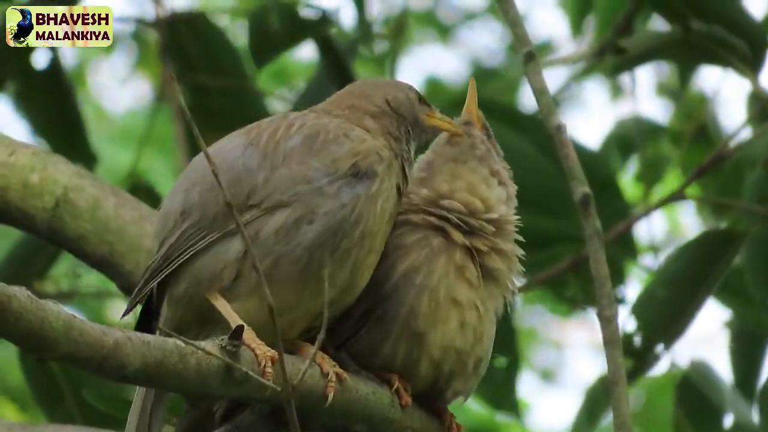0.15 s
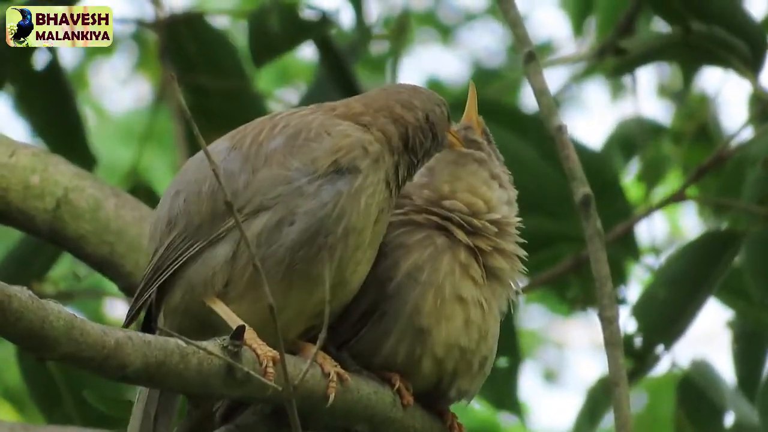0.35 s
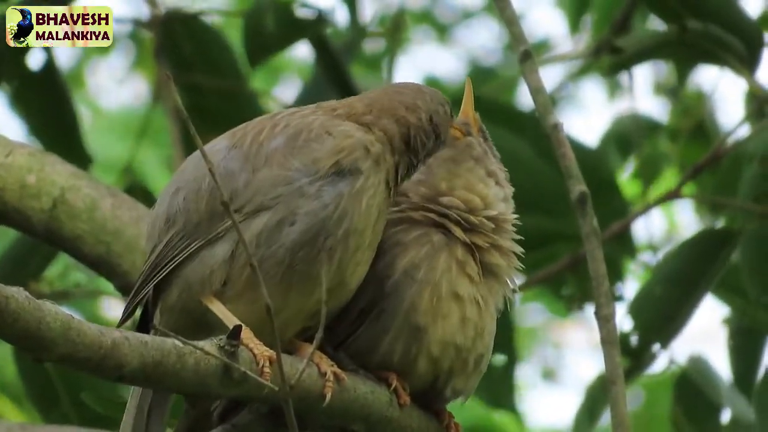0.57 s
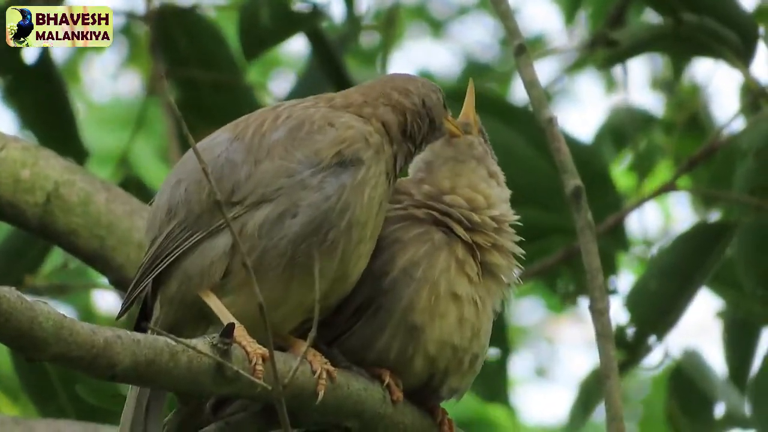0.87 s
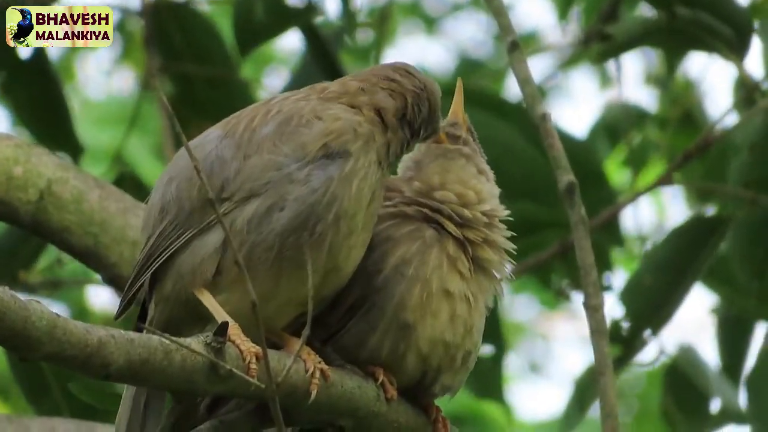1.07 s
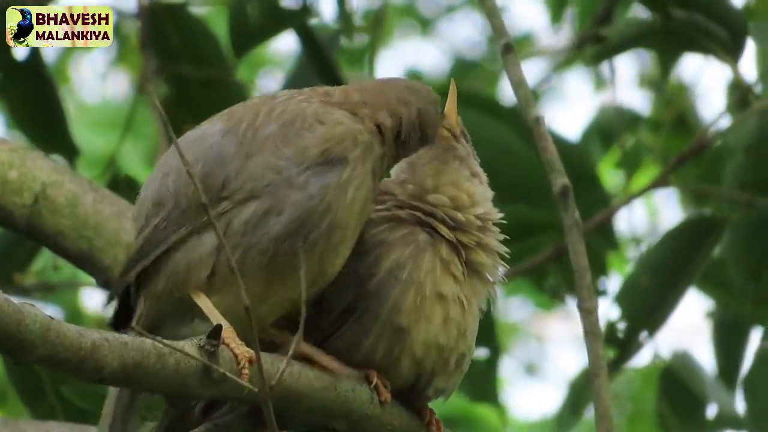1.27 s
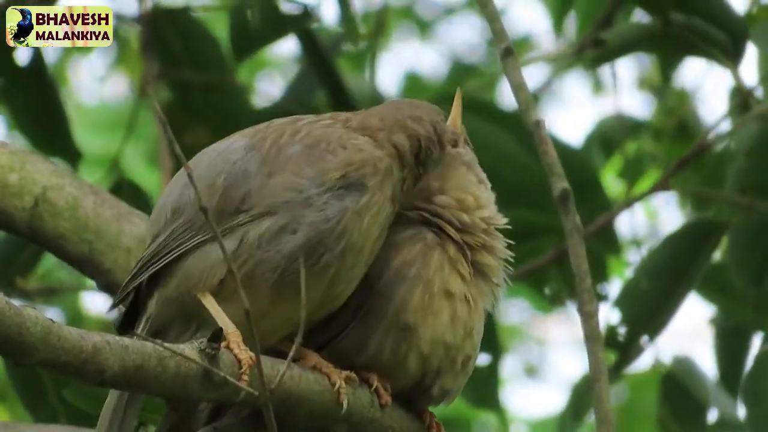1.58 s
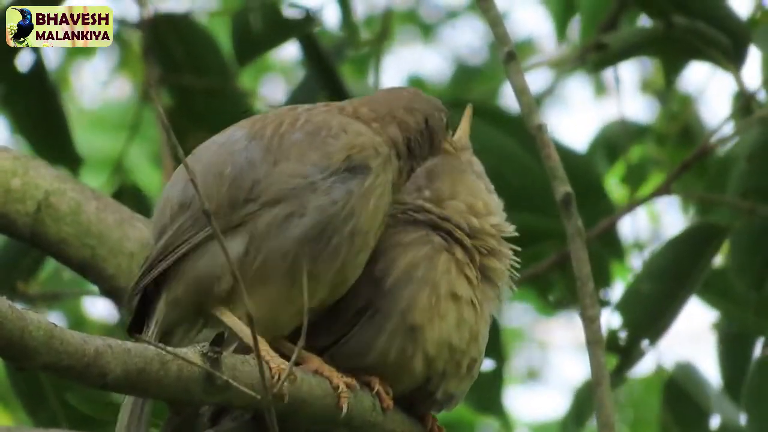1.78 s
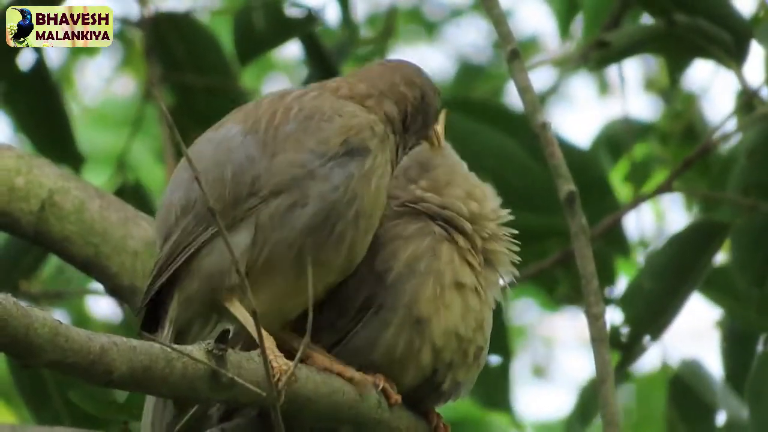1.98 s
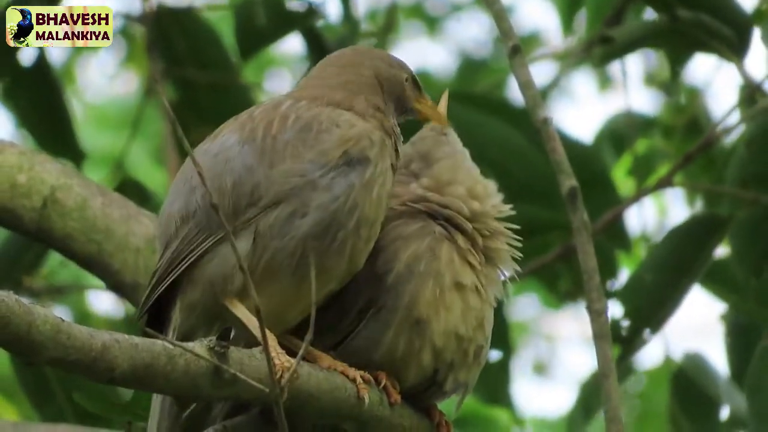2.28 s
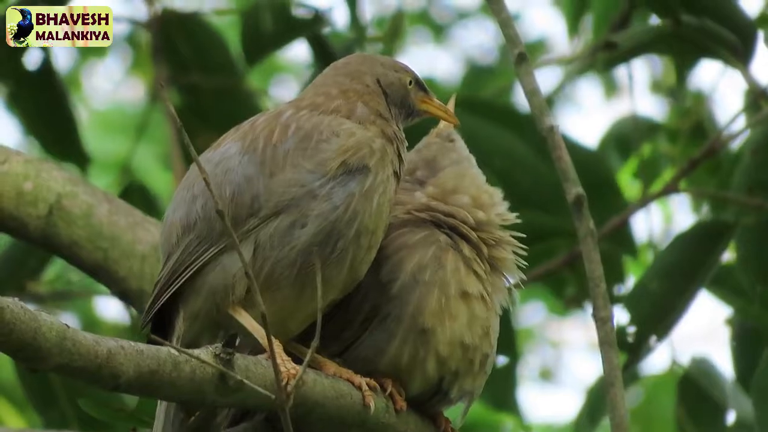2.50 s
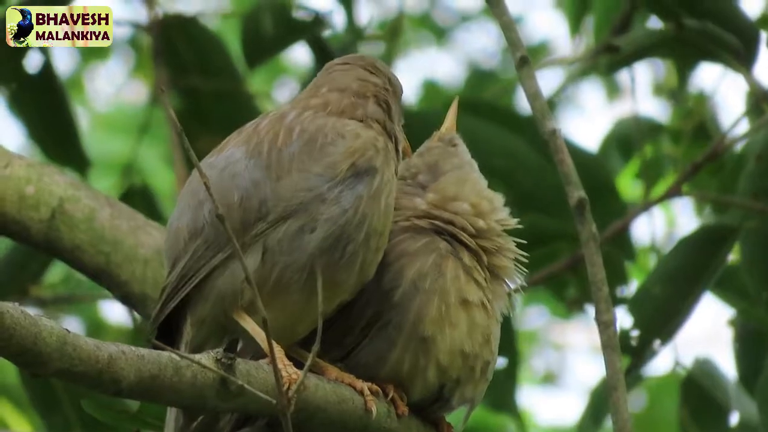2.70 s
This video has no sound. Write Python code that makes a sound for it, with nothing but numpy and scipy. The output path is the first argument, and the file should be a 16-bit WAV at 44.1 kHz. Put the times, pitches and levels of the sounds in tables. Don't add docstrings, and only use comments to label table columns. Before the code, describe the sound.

Babblers call close by in foliage. Faint slurred whistles open, then rasps and husky whistles from 0.25 s build to a loud harsh burst at 0.75. A pure piping note at 0.85 leads to a quick two-syllable warble at 1.0-1.15. A calmer gap follows, with faint dry leaf ticks from 1.6; sharp whistles hit at 2.0, then scattered scolds. Low rumble, wind bumps, leaf hiss and thin insects run beneath.

```python
import sys
import numpy as np
from scipy import signal
from scipy.fft import rfft, irfft
from scipy.io import wavfile
from scipy.ndimage import uniform_filter1d

SR = 44100
rng = np.random.default_rng(int(sys.argv[2]) if len(sys.argv) > 2 else 0)


def store_pcm(level_fs):
    pcm = np.round(np.clip(level_fs, -1, 1) * 32767).astype(np.int16)
    wavfile.write(sys.argv[1], SR, np.atleast_2d(pcm).T)


def volts(x):
    e = np.asarray(x, float) / 20
    return 10 ** e


N = 125685

# multiple of the pitch, level in dB.
PARTIALS = [(1, 1.5), (1.5, -28), (2, -30.5), (.5, -29.5)]
FALL_S = .008


def evened(x):
    return x / np.sqrt(np.mean(x ** 2) + 1e-20)


def add(mix, s, sound):
    part = mix[round(s * SR):][:len(sound)]
    part += sound[:len(part)]


def drift(n, per_s):
    w = max(int(SR / per_s / 2), 1)
    noise = rng.standard_normal(6000 + n)
    smooth = uniform_filter1d(uniform_filter1d(noise, w), w)
    return evened(smooth)[3000:3000 + n]


def sine(hz):
    return np.sin(2 * np.pi * np.cumsum(hz) / SR)


def resonate(x, hz, width_hz):
    turn = np.exp(2j * np.pi * np.cumsum(hz) / SR)
    r = np.exp(-np.pi * width_hz / SR)
    return 2 * (turn * signal.lfilter([(1 - r) ** 2], [1, -2 * r, r * r], x / turn)).real


def air(spectrum, patchy_db):
    frames = N // 256 + 5
    a, b, p = rng.standard_normal((frames, 513, 3)).T
    patches = evened(uniform_filter1d(uniform_filter1d(p, 10, 0), 12, 1))
    z = (a + 1j * b) * volts(patchy_db * patches)
    x = signal.istft(z, nperseg=1024, noverlap=768)[1][:N]
    f, db = np.transpose(spectrum)
    fine = np.fft.rfftfreq(N, 1 / SR)
    colour = np.interp(np.log(fine + 1), np.log(f + 1), db, -90, -90)
    return evened(irfft(rfft(x) * volts(colour), N))


def widen(mid, side):
    return np.array([mid + side, mid - side])


def rumble():
    # time in seconds, level in dB.
    gusting = [
        (0, -32.5),
        (.3, -29),
        (0.701, -26.5),
        (1.2, -27.5),
        (1.7, -29.5),
        (2.1, -27),
        (2.45, -30.5),
        (2.85, -30.5),
    ]
    # frequency in Hz, density in dB.
    low_colour = [(18, -15), (50, 2), (109, 0.5), (164, -1.5), (285, -17), (520, -27)]
    # frequency in Hz, density in dB.
    low_side_colour = [(25, -21), (70, 2), (150, 0.5), (300, -12)]
    s, db = np.transpose(gusting)
    gust = volts(np.interp(np.arange(N) / SR, s, db))
    return gust * widen(air(low_colour, 1.6), volts(-8.5) * air(low_side_colour, 2.4))


def leaf_hiss():
    # frequency in Hz, density in dB.
    hiss_colour = [(200, -2.5), (478, -8.5), (763, -6), (1510, -16.5), (2790, -12.5), (3700, -21),
                   (5700, -29), (7150, -24.5), (9400, -37)]
    # frequency in Hz, density in dB.
    hiss_side_colour = [(280, 0.5), (600, -10), (2900, -19.5), (5800, -25.5), (9200, -24)]
    return widen(volts(-39) * air(hiss_colour, 1.48), volts(-44) * air(hiss_side_colour, 1.3))


def insects():
    # frequency in Hz, density in dB.
    chorus_colour = [(8800, -21), (10100, 1.5), (10400, 2.5), (10900, -4.5), (11400, -19), (14400, -16.5),
                     (15700, -24)]
    return widen(volts(-56.5) * air(chorus_colour, 0.95), volts(-53) * air(chorus_colour, 1.1))


def shape(t, length):
    rise_s = 0.0038
    return np.clip(t / rise_s, 0, 1) * np.clip((length + FALL_S / 2 - t) / FALL_S, 0, 1)


def whistle(start, length, first_hz, last_hz, db, flutter_db, husk_db):
    wobble_hz = 40
    t = np.arange(0, length + FALL_S / 2, 1 / SR)
    hz = first_hz + (last_hz - first_hz) * t / length + wobble_hz * drift(len(t), 124.0)
    tone = np.sqrt(2) * sine(hz)
    husk = evened(resonate(rng.standard_normal(len(t)), hz, 700.0))
    level = volts(db + flutter_db * drift(len(t), 263.0))
    return start, (tone + volts(husk_db) * husk) * shape(t, length) * level


def far_whistles():
    # start in seconds, length in seconds, first pitch in Hz, last pitch in Hz, level in dB.
    far_calls = [(.02, .058, 3700, 3600, -46), (.078, .018, 2850, 3400, -41), (.052, .02, 2700, 2760, -44),
                 (.112, .018, 6150, 5300, -55), (.139, .02, 6000, 5400, -53), (.17, .014, 6100, 5650, -55),
                 (.168, .021, 3000, 3150, -37), (.182, .075, 2520, 2330, -40),
                 (.195, .017, 3580, 3520, -39), (.212, .017, 3480, 2800, -40),
                 (.213, .035, 4000, 4080, -44), (.203, .05, 1980, 1900, -45), (.565, .04, 6450, 6400, -57),
                 (.665, .075, 6400, 6450, -58), (.195, .042, 745, 740, -41), (1.905, .016, 6100, 5700, -51),
                 (1.925, .018, 6400, 5900, -50), (1.945, .01, 6250, 6400, -52),
                 (.335, .04, 6150, 6400, -55), (.375, .038, 6400, 6400, -51), (.43, .025, 6400, 6380, -53),
                 (2.075, .07, 6400, 6550, -53), (2.16, .15, 6550, 6600, -59), (2.455, .01, 4000, 2300, -39),
                 (1.845, .032, 3100, 2450, -43), (1.83, .074, 2150, 2100, -41),
                 (2.378, .045, 3200, 2900, -40), (2.364, .012, 2750, 3250, -43),
                 (2.325, .03, 2920, 2500, -43), (2.335, .085, 2280, 2200, -44),
                 (2.402, .012, 3850, 3800, -44), (2.428, .026, 3680, 4250, -43),
                 (2.668, .035, 1500, 2200, -47), (.378, .07, 1560, 1450, -44),
                 (1.495, .075, 2780, 2850, -44), (1.575, .04, 2900, 2750, -50),
                 (2.465, .08, 2050, 2500, -43), (1.4, .068, 2250, 2900, -46)]
    far = np.zeros(N)
    for row in far_calls:
        add(far, *whistle(*row, flutter_db=1.8, husk_db=-7))
    return far


def foliage(x):
    close_t60_s, tail_t60_s = 0.12, 0.46
    t = np.arange(SR // 2) / SR
    taps = rng.standard_normal((len(t), 2)).T * (rng.random((len(t), 2)).T < .2)
    taps = taps + 0.46 * taps[::-1]
    decay = volts(-60 * t / close_t60_s) + volts(-9 - 60 * t / tail_t60_s)
    taps = taps * decay * (t > .003)
    return signal.fftconvolve(x[None], taps / np.linalg.norm(taps[0]), axes=1)[:, :N]


def rasp(start, length, first_hz, last_hz, db):
    pulses_per_s, jitter, breathy = 250, .13, .25
    throat_width_hz, strand_swing_hz, strand_share = 900, 220, .45
    overtone_db = -27
    t = np.arange(0, length + FALL_S, 1 / SR)
    turns = np.cumsum(pulses_per_s * volts(8.75 * jitter * drift(len(t), 150.))) / SR
    chop = breathy + np.sin(np.pi * turns) ** 2
    hz = first_hz + (last_hz - first_hz) * np.minimum(t / length, 1) ** 0.705
    puffs = chop * rng.standard_normal(len(t))
    breath = resonate(resonate(puffs, hz, throat_width_hz), hz, throat_width_hz)
    strands = np.zeros(len(t))
    for _ in range(2):
        strength = volts(2.0 * drift(len(t), 60.))
        strands += chop * strength * sine(hz + strand_swing_hz * drift(len(t), 69.8))
    overtone = evened(resonate(puffs, 1.76 * hz, 1600.0))
    voice = strand_share * evened(strands) + (1 - strand_share) * evened(breath)
    voice = voice + volts(overtone_db) * overtone
    swell = np.clip(t / 0.0034, 0, 1) * np.clip((length + FALL_S - t) / 0.011, 0, 1)
    return start, evened(voice) * swell * volts(db)


def scolds():
    # start in seconds, length in seconds, first throat Hz, last throat Hz, level in dB. The long row
    # near 7.1 kHz is an insect.
    scold_calls = [(.259, .014, 3540, 3500, -36.5), (.264, 0.0141, 2960, 2250, -29),
                   (0.284, 0.079, 2820, 2596, -34.5), (.475, .026, 1773, 1990, -36),
                   (.479, 0.028, 2710, 2800, -32.5), (0.508, 0.024, 3430, 3366, -32),
                   (.517, .014, 2200, 1900, -32), (.518, 0.0373, 2813, 2550, -27),
                   (0.549, .11, 2697, 2480, -28.5), (0.752, 0.0303, 3440, 3000, -24),
                   (.765, .06, 3100, 3000, -27), (0.776, .055, 2796, 2630, -19),
                   (0.5, .58, 7160, 7100, -59), (1.705, .084, 2990, 3210, -42.5),
                   (1.718, .04, 3450, 3580, -42.5), (1.812, 0.039, 3750, 3200, -40),
                   (1.811, .03, 2295, 2200, -42.5), (1.901, 0.095, 2496, 2400, -32.5),
                   (1.93, 0.0395, 3120, 3600, -31.5), (1.961, 0.033, 4030, 4020, -30.5),
                   (1.976, .07, 2400, 2210, -36), (2.06, 0.0997, 3305, 3060, -37.5),
                   (2.17, .13, 2150, 2030, -42), (2.528, 0.0196, 3600, 4210, -40.5),
                   (2.548, .05, 3750, 3200, -36.5), (2.475, .055, 3300, 2750, -40),
                   (2.601, 0.047, 3300, 2914, -37.5), (2.727, .022, 4270, 4040, -44.5),
                   (2.753, 0.036, 3250, 3450, -41), (2.725, 0.025, 2600, 2520, -49),
                   (2.783, .012, 4850, 4490, -37.5), (1.33, .07, 2750, 2400, -47)]
    near = np.zeros(N)
    for row in scold_calls:
        add(near, *rasp(*row))
    return near


def near_whistles():
    # start in seconds, length in seconds, first pitch in Hz, last pitch in Hz, level in dB.
    near_calls = [(1.235, 0.077, 2450, 1800, -42), (.278, .095, 1860, 1740, -37),
                  (1.97, .011, 4700, 3100, -23.5), (1.992, 0.0187, 3350, 3050, -20.5),
                  (2.01, 0.0091, 3300, 3400, -17.5), (2.016, 0.014, 2900, 2850, -20.5),
                  (2.026, .075, 3650, 2400, -23), (2.105, 0.0373, 2450, 2000, -35),
                  (2.142, 0.012, 1670, 1620, -39.5), (2.158, 0.0405, 2320, 2050, -42),
                  (2.555, 0.0376, 3000, 2350, -26), (2.498, .055, 3000, 3150, -36),
                  (2.14, .04, 2900, 2600, -41), (2.797, .028, 4500, 3650, -36),
                  (2.826, 0.022, 3400, 2900, -38), (.572, 0.02, 3150, 3200, -24),
                  (.585, .055, 2800, 2750, -23), (.307, 0.015, 2960, 2880, -27),
                  (.286, .016, 2600, 2850, -33), (.595, 0.016, 2700, 2460, -26.5),
                  (1.175, 0.053, 2950, 2950, -39.5), (.33, .022, 2950, 2650, -28),
                  (.372, 0.033, 1950, 1980, -30.5), (.285, 0.02, 2050, 2050, -31),
                  (.348, 0.032, 2220, 2400, -30)]
    near = np.zeros(N)
    for row in near_calls:
        add(near, *whistle(*row, flutter_db=1.5, husk_db=-8))
    return near


def wind_bumps():
    # start in seconds, peak level in dB, pitch in Hz.
    pushes = [(0.365, -16, 81.5), (0.409, -16.5, 119), (0.755, -12.5, 93.4), (0.799, -13, 81.5),
              (1.144, -15, 122), (1.268, -18.5, 59.2), (1.392, -17, 90), (1.587, -10, 80.6),
              (1.798, -17.5, 67.3), (1.889, -12.5, 96), (1.984, -11, 118), (.29, -19.5, 70),
              (1.02, -20, 95), (1.075, -18, 88), (2.18, -19, 111), (1.86, -19, 109)]
    cycles = 2.56
    out = np.zeros(N)
    for s, db, hz in pushes:
        u = np.arange(0, 1, hz / cycles / SR)
        add(out, s, volts(db - 0.5) * np.sin(np.pi * u) ** 2 * np.sin(2 * np.pi * cycles * u))
    return out


def syllable(rows, partials, flutter_db):
    s, hz, db = np.transpose(rows)
    t = np.arange(s[0], s[-1], 1 / SR)
    pitch = uniform_filter1d(np.interp(t, s, hz), size=150)
    pitch = pitch + 18 * flutter_db * drift(len(t), 157.0)
    turns = np.cumsum(pitch) / SR
    tone = np.zeros(len(t))
    for k, d in partials:
        dulling_db = np.maximum(k * pitch - 5400, 0) / 45
        level = volts(d - dulling_db + flutter_db * k * drift(len(t), 240.0))
        tone += level * np.sin(2 * np.pi * k * turns)
    tone = tone * (1 + 0.16 * flutter_db * np.sin(2 * np.pi * turns / 11) * drift(len(t), 40.))
    envelope = volts(np.interp(t, s, db)) * shape(t - s[0], s[-1] - s[0] - FALL_S / 2)
    return s[0], np.sqrt(2) * tone * envelope


def piping_note():
    # time in seconds, pitch in Hz, level in dB.
    pipe_curve = [
        (.832, 3198, -15.5),
        (.864, 3260, -12.5),
        (.871, 3338, -29),
        (.886, 3190, -23.5),
        (.905, 3160, -41),
    ]
    near = np.zeros(N)
    add(near, *syllable(pipe_curve, PARTIALS[:1], 0.99))
    return near


def warbled_phrase():
    # time in seconds, pitch in Hz, level in dB.
    phrase = [
        [(.965, 2655, -32), (.975, 2160, -27), (.987, 2930, -22.5), (.997, 2410, -22), (1.005, 3046, -16),
         (1.016, 2602, -19), (1.04, 2428, -17), (1.054, 2510, -26.5), (1.063, 2420, -26)],
        [(1.066, 2850, -24), (1.085, 3330, -25), (1.091, 2762, -34), (1.1, 3460, -19.5), (1.113, 2986, -19),
         (1.133, 2800, -22.5), (1.141, 3055, -20), (1.15, 2533, -22.5), (1.172, 2444, -29)],
    ]
    near = np.zeros(N)
    for rows in phrase:
        add(near, *syllable(rows, PARTIALS, 2.13))
    return near


def leaf_ticks():
    rattle = (1.62, .34, 90, 5100, -50)
    start, length, per_s, hz, db = rattle
    n = round(length * SR)
    count = np.cumsum(per_s * volts(4.5 * drift(n, 40.))) / SR
    hits = np.diff(np.floor(count), prepend=0)
    decay = np.exp(-1 / (0.0034 * SR))
    bursts = signal.lfilter([1], [1, -decay], hits) * rng.standard_normal(n)
    ticking = evened(resonate(bursts, hz + 400 * drift(n, 60.), 1600.))
    far = np.zeros(N)
    add(far, start, volts(db) * np.linspace(1, .5, n) * ticking)
    return far


def scene():
    background = rumble() + leaf_hiss() + insects() + wind_bumps()
    far = far_whistles() + leaf_ticks()
    near = scolds() + near_whistles() + piping_note() + warbled_phrase()
    direct = near * volts(np.array([[-.6], [.6]])) + far * volts(np.array([[.3], [-.3]]))
    echoes = foliage(volts(-6.5) * near + volts(-3.5) * far)
    return direct + echoes + background


def low_pass(x):
    return signal.sosfilt(signal.butter(12, 15730, fs=SR, output="sos"), x)


def record(dry):
    end_fade_s = .003
    mix = dry * np.clip(np.arange(N, 0, -1) / SR / end_fade_s, 0, 1)
    return low_pass(mix)


dry = scene()
out = record(dry)
store_pcm(out)
```